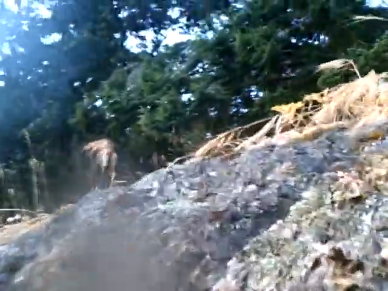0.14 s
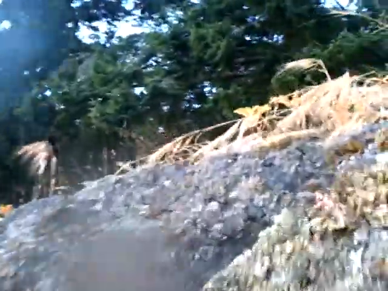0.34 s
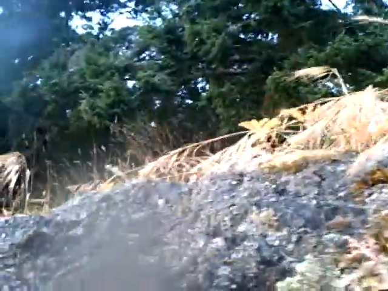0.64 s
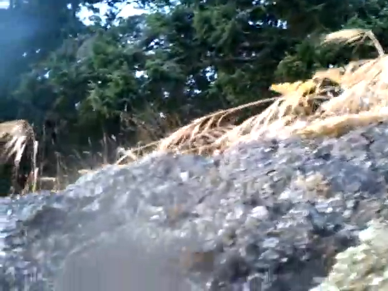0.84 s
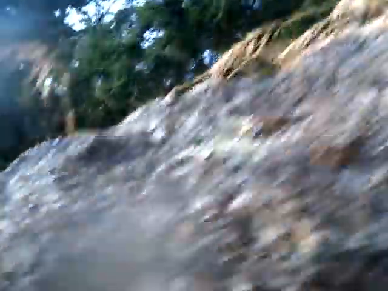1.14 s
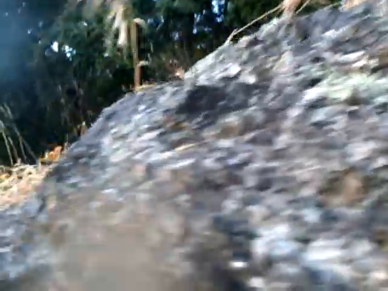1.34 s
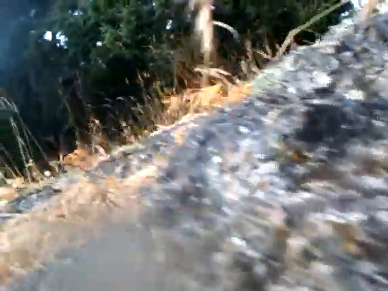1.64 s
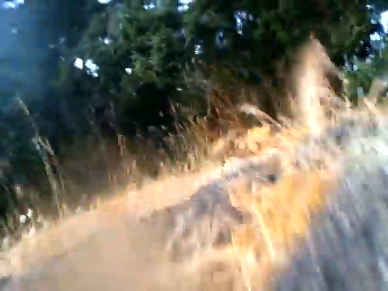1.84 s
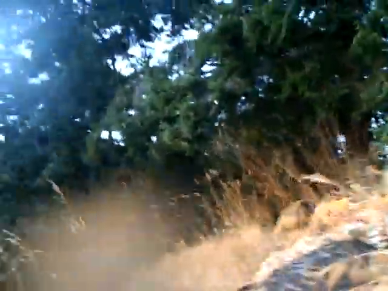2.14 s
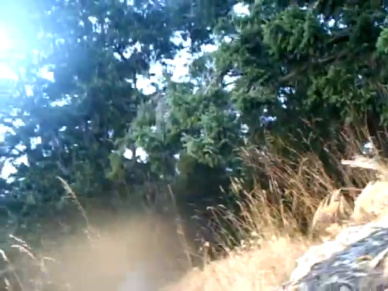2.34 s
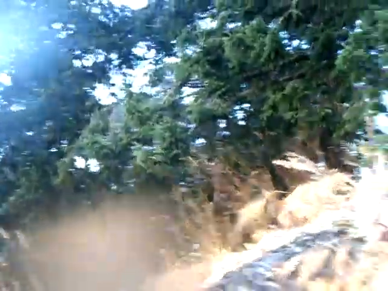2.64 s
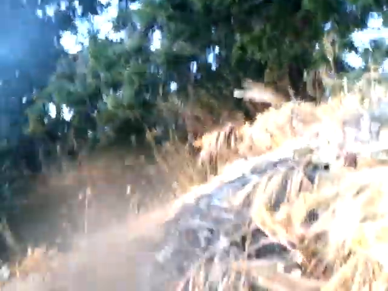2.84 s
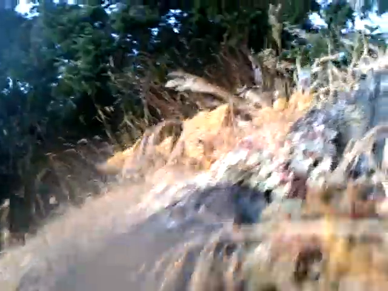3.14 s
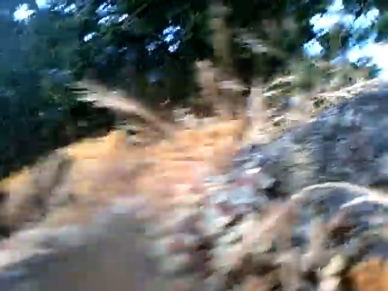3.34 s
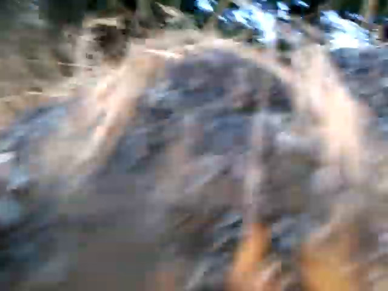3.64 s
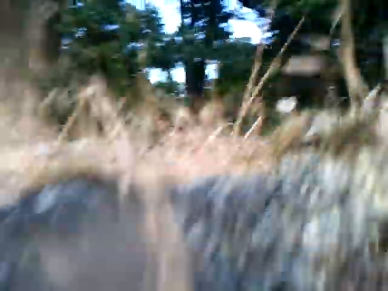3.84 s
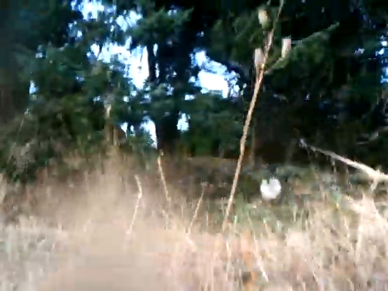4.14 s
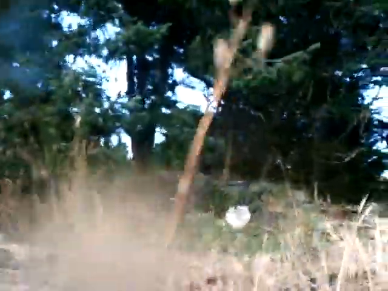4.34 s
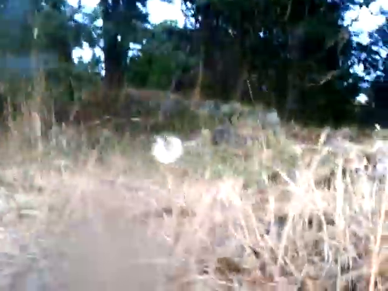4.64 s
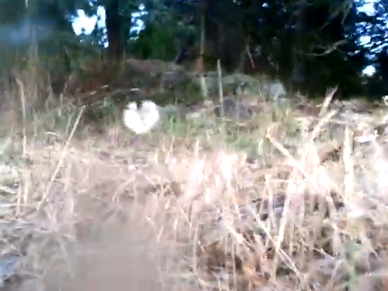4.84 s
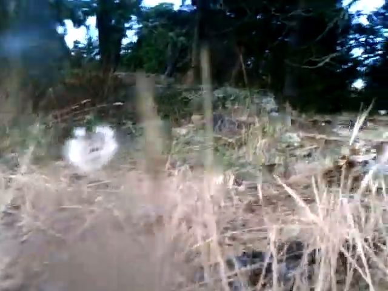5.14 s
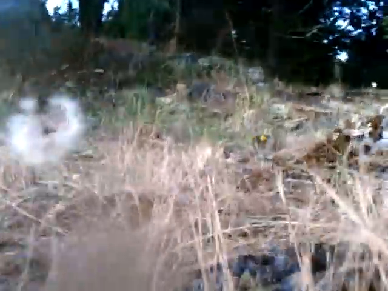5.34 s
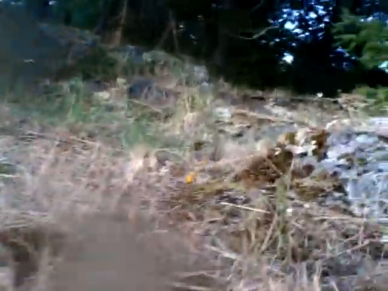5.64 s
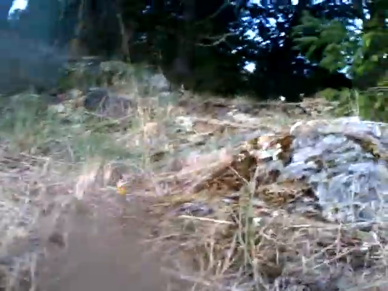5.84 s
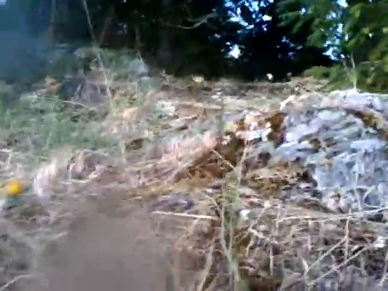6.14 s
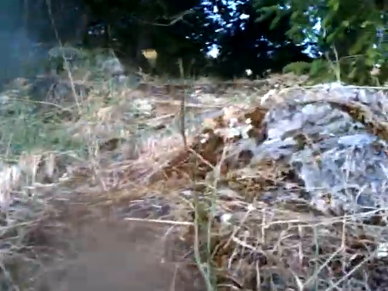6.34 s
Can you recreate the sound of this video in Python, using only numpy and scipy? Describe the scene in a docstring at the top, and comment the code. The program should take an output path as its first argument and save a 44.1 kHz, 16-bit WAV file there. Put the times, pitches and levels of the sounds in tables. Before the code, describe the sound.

A small camera is dragged over rock and through dry grass, heard right at its microphone. For the first 2.7 seconds there are light, stuttering rubs and gritty ticks on the plastic shell, with dull hollow bumps, a brief creak near 1 second and a soft swish of stalks around 1.5. From 2.8 seconds the scraping grows louder. Between 3.2 and 4.7 it is harsh and ringing, and the hardest scrapes distort; sharp stalk snaps come near 3, 3.9 and 4.1. A lull with a few knocks follows, then dry grass crackles, hisses and snaps from about 5.2 seconds. Scrapes build again from 5.5, loudest and distorted around 6.1 and from 6.4 to the end at 6.5. Throughout, a low wind rumble rocks the microphone, with faint electronic hiss and a thin, high, slightly wavering whistle.

```python
"""Gritty rubbing over a low wind rumble: a small camera is dragged through dry grass and over rock.
Grit rubs and strikes its plastic shell, which rings right at the microphone; dull bumps swing the
hollow body, and stalks swish, crackle and snap in the air. From about halfway the hardest scrapes
overdrive the input. Wind rocks the microphone port; the electronics add hiss and two thin whistles."""
import sys
import numpy as np
from scipy.fft import rfft, irfft, next_fast_len
from scipy.io import wavfile
from scipy.ndimage import map_coordinates

SR = 44100
rng = np.random.default_rng(int(sys.argv[2]) if len(sys.argv) > 2 else 0)


def master_out(mix):
    """Clip the mix to full scale and print it as 16-bit PCM to the path in sys.argv[1]."""
    frames = np.transpose(np.atleast_2d(mix))
    ceiling = np.clip(frames, -1, 1)
    pcm = np.round(ceiling * 32767).astype(np.int16)
    wavfile.write(sys.argv[1], SR, pcm)


N = 286650

# The drag, one list a pass: time_s, shell_rub_db, grass_db
DRAG_PASSES = [
    [(0, -33.5, -56), (.07, -59, -59), (.15, -42, -54), (.18, -35, -45.5), (.23, -38, -55), (.35, -44, -52),
     (.44, -64, -62), (.51, -41, -69), (.55, -67, -74), (.62, -60, -64)],
    [(.65, -60, -66), (.69, -50, -60), (.88, -67, -70), (.98, -38.5, -58), (1.01, -44, -67),
     (1.1, -35, -63), (1.15, -33, -62), (1.18, -41.5, -60), (1.21, -28, -60), (1.24, -46.5, -60),
     (1.29, -48, -60), (1.34, -63, -70)],
    [(1.41, -53, -60.5), (1.47, -60, -58.5), (1.51, -34.5, -63.5), (1.62, -47, -54), (1.77, -42.5, -58),
     (2.05, -66, -65), (2.15, -57, -69), (2.23, -38, -70), (2.31, -79, -71), (2.35, -40, -62),
     (2.41, -72, -80), (2.51, -52, -71), (2.59, -74, -76), (2.7, -55, -60.5)],
    [(2.73, -61, -58), (2.76, -36, -68), (2.84, -28.5, -62), (2.9, -17.5, -44), (2.94, -27, -54),
     (3.09, -25.5, -47), (3.13, -35.5, -53.5), (3.19, -68, -68)],
    [(3.22, -38.5, -70), (3.25, -6.5, -66), (3.3, -4, -36), (3.52, -1, -22.5), (3.57, 0.5, -24),
     (3.6, -12.5, -43), (3.65, -10.5, -42), (3.69, -9, -45), (3.73, -3.5, -35), (3.77, -15, -48),
     (3.89, -18.5, -33.5), (3.94, -17.5, -37), (3.96, -27.5, -65), (4.02, -29, -49.5), (4.09, -38, -53),
     (4.13, -53, -71)],
    [(4.15, -53, -56), (4.18, -45, -47), (4.3, -23.5, -42.5), (4.36, -16.5, -46), (4.38, -9.5, -43),
     (4.51, -13.5, -37), (4.57, -33, -55), (4.62, -37, -50), (4.67, -13.5, -54), (4.7, -55, -47)],
    [(4.75, -52.5, -74), (4.96, -40, -59.5), (5.17, -40.5, -51), (5.21, -21, -29), (5.24, -44, -61),
     (5.28, -29.5, -39), (5.37, -37, -45.5), (5.4, -32, -51)],
    [(5.46, -29, -42), (5.5, -32, -46), (5.59, -24.5, -37.5), (5.63, -20, -41.5), (5.68, -24.5, -46),
     (5.76, -24.5, -47), (5.82, -16.5, -39), (5.85, -32, -35), (5.89, -14.5, -31.5), (5.93, -24, -55),
     (5.97, -13.5, -40), (5.99, -5, -38), (6.02, -7.5, -37), (6.07, -3, -51), (6.11, -11.5, -48),
     (6.125, -21, -49), (6.145, -27, -67.5)],
    [(6.17, -27, -48), (6.27, -21, -43), (6.32, -18, -50), (6.35, -35, -70), (6.395, -5.5, -40),
     (6.45, 2.5, -27), (6.5, -2.5, -31)],
]
# The shell's main ring: pitch_hz, width_hz, level_db
SHELL_MODES = [(1346.7, 264, 0), (1479, 354, -17.5), (1045, 540, -22.5), (580, 260, -28),
               (3350, 1040, -28.5)]
# The shell's bright upper ring: pitch_hz, width_hz, level_db
BRIGHT_MODES = [(2038, 315, 15.5), (2540, 580, -46), (3900, 160, -16.5), (4554, 1070, -7.5),
                (7060, 4700, -22.5)]
# Colour of airborne sound at the microphone port: pitch_hz, width_hz, level_db
PORT_MODES = [(4880, 370, -3.5), (6850, 1140, -2.5), (9460, 1200, -5), (11740, 1500, -13.5),
              (15550, 18000, -8.5)]
BITE_S = 0.00099  # attack of a crack, a snap or the panel's hum


def amp(db):
    return 10 ** (np.asarray(db) / 20)


def unit_rms(x):
    return x / np.sqrt(np.mean(x ** 2) + 1e-20)


def curves(rows):
    """One smooth lane of automation for each column after the time."""
    times, *columns = np.vstack(rows).T
    return [np.interp(np.arange(N) / SR, times, column) for column in columns]


def wobble(rate_hz):
    """A smooth random drift, rate_hz turning points a second."""
    points = rng.standard_normal(int(N * rate_hz / SR) + 4)
    return map_coordinates(points, [np.arange(N) * rate_hz / SR])


def swell(start_s, hold_s, level_db, rise_db_per_s, fall_db_per_s):
    """Gain that rises until start_s, holds and falls away."""
    t = np.arange(N) / SR - start_s
    return amp(level_db + rise_db_per_s * np.minimum(t, 0) - fall_db_per_s * np.maximum(t - hold_s, 0))


def filtered(x, response):
    """x through a complex frequency response."""
    size = next_fast_len(x.shape[-1] + SR // 10)
    return irfft(rfft(x, size) * response(np.fft.rfftfreq(size, 1 / SR)), size)[..., :x.shape[-1]]


def coloured_noise(spectrum):
    """Noise of rms 1, shaped by (pitch_hz, level_db) points."""
    pitch_hz, level_db = np.transpose(spectrum)
    tilt = lambda hz: amp(np.interp(np.log(hz + 1), np.log(pitch_hz + 1), level_db))
    return unit_rms(filtered(rng.standard_normal(N), tilt))


def ringing(x, modes):
    """x through steep resonances (each passed twice); white noise keeps its rms."""
    def response(f):
        bands = sum(amp(db) * (1j * f * width / (hz * hz - f * f + 1j * f * width)) ** 2
                    for hz, width, db in modes)
        return bands / np.sqrt(np.mean(np.abs(bands) ** 2))
    return filtered(x, response)


def grit(per_s, spread_db, smooth):
    """Tiny impacts of uneven size over a share of smooth noise, rms 1."""
    size = amp(spread_db * np.minimum(rng.exponential(size=N), 4)) * rng.standard_normal(N)
    grains = unit_rms(size * (rng.random(N) < per_s / SR))
    return unit_rms(grains + smooth * rng.standard_normal(N))


def burst(envelope, modes):
    """One puff of noise rung through resonances, peak 1."""
    sound = ringing(envelope * rng.standard_normal(len(envelope)), modes)
    return sound / np.abs(sound).max()


def add(track, start_s, sound):
    part = track[round(start_s * SR):][:len(sound)]
    part += sound[:len(part)]


def ground_tone():
    """The tone of the ground under the shell, stepping from patch to patch."""
    # start_s, bright_db and body_db (over the rub), swish_db (over the grass)
    patches = [(0, -30, -11, 9), (.62, -25, -40, 8.5), (1.01, -19, -3, 3), (1.13, -22, -23, 7),
               (1.4, -33, -45, 12), (2.72, -12, -13, 3), (2.93, -17, -3, 2), (3.19, -8.5, -18, 13),
               (3.6, -9.5, -16, 6), (3.878, -11, -28, 6.5), (3.96, -3, -11.5, 17.5), (4.14, -9, -16, 9.5),
               (4.57, -23, -16, 5), (4.73, -17, -7.5, 12), (5.16, -13, -13, 7), (5.44, -6.5, -20, 5.5),
               (5.86, -6, -16.5, 5), (6.14, -5.5, -18.5, 11.5), (6.35, -7.5, -19.5, 7)]
    starts, *columns = np.transpose(patches)
    current = np.searchsorted(starts, np.arange(N) / SR, "right") - 1
    return [column[current] for column in columns]


def shell_rub():
    """Rubbing stutters as the shell catches and slips on grit, ringing its walls and hollow body."""
    # The hollow body: pitch_hz, width_hz, level_db
    body_modes = [(409, 97, 4), (336, 147, 2), (173, 29.6, -1), (107, 37, -8)]
    rub_db, _ = curves(DRAG_PASSES)
    bright_db, body_db, _ = ground_tone()
    stutter = amp(rub_db + 2.5 * wobble(25) + 2.5 * wobble(70))
    rattle = amp(body_db + 1.5 * wobble(15))
    ring = ringing(stutter * grit(1500, spread_db=4, smooth=1), SHELL_MODES)
    bright = ringing(stutter * amp(bright_db) * grit(1500, spread_db=4, smooth=1), BRIGHT_MODES)
    body = ringing(stutter * rattle * grit(800, spread_db=3, smooth=1), body_modes)
    return ring + bright + body


def wind():
    """Slow buffeting of the microphone port."""
    # Wind strength: time_s, level_db
    gusts = [(0.0, -32.5), (0.98, -49.5), (1.18, -28), (1.86, -37), (1.92, -38), (2.19, -36.5), (2.23, -39),
             (3.08, -34.5), (3.11, -42.5), (3.55, -25), (4.27, -44), (4.4, -33), (4.54, -39.5),
             (5.77, -42.5), (5.83, -32.5), (6.19, -42.5), (6.43, -31), (6.5, -34)]
    # Rumble spectrum: pitch_hz, level_db
    rumble = [(12, -8.5), (27, -14.5), (46, -3), (58, -9.5), (70, -47), (100, -34), (200, -52), (400, -92)]
    level_db, = curves(gusts)
    return amp(level_db + 2 * wobble(7.3)) * coloured_noise(rumble)


def electronics():
    """A noise floor and two whistles whose pitch wavers."""
    # Whistles: pitch_hz, level_db, waver_hz
    tones = [(7736, -70, 25), (15470, -64, 5)]
    # Hiss spectrum: pitch_hz, level_db
    hiss = [(80, 7), (250, -3), (1100, -15), (1400, 9.5), (1800, -41), (3000, -6.5), (5000, -21),
            (16500, -20)]
    whistles = sum(amp(db + 5) * np.sin(2 * np.pi * np.cumsum(hz + waver_hz * wobble(60)) / SR)
                   for hz, db, waver_hz in tones)
    return amp(-51.5) * coloured_noise(hiss) + whistles


def grass():
    """Stalks swish and crackle densely; the larger ones snap singly."""
    # Soft tufts swiping the shell: start_s, hold_s, level_db
    swipes = [(0.157, 0.016, -46), (0.7, .005, -56), (0.95, 0.036, -42), (1.26, 0.016, -43),
              (1.496, 0.047, -36), (1.57, 0.026, -40), (2.173, .01, -62), (2.345, .02, -60),
              (2.959, 0.0044, -21), (3.992, 0.044, -30.5), (5.484, .006, -40), (5.607, .01, -29),
              (5.88, 0.014, -21)]
    # Colour of soft stalks: pitch_hz, width_hz, level_db
    swish_modes = [(1520, 384, 13), (2190, 370, 4.5), (2830, 410, 2.5), (3827, 280, 0.5)]
    # Stalks breaking: start_s, level_db, pitch_hz
    snaps = [(0.1994, -28, 9100), (0.2294, -32, 9070), (0.2694, -32, 9900), (0.2962, -34, 9300),
             (0.463, -35, 8100), (0.693, -37, 7740), (1.567, -22, 7200), (1.607, -23.5, 8750),
             (1.6168, -23.5, 7040), (1.6464, -26, 8570), (2.2655, -31.5, 6860), (2.326, -36, 9170),
             (2.961, -11, 4970), (3.8503, -3, 5460), (4.108, -8.5, 6800), (5.018, -24.5, 7140),
             (5.1724, -25, 6830), (5.199, -18, 9400), (5.2089, -8.5, 9400), (5.217, -9.5, 11400),
             (5.274, -17, 7540), (5.3073, -11.5, 6230), (5.3374, -15.5, 6280), (5.3504, -21, 6280),
             (5.3717, -18.5, 6200), (5.4197, -16, 8000), (5.4518, -19, 6740), (5.5068, -15, 6840),
             (5.536, -14, 7010), (5.7327, -19, 5900), (5.786, -14, 9000), (5.903, -17, 5900),
             (6.058, -8, 5330), (6.1, 1, 7260)]
    _, grass_db = curves(DRAG_PASSES)
    *_, swish_db = ground_tone()
    tufts = sum(swell(*swipe, rise_db_per_s=1500, fall_db_per_s=1000) for swipe in swipes)
    flutter = amp(3 * wobble(30))
    crackle = ringing(flutter * amp(grass_db) * grit(1500, spread_db=5, smooth=0.89), PORT_MODES)
    swish_gain = flutter * (amp(grass_db + swish_db) + tufts)
    swish = ringing(swish_gain * grit(1200, spread_db=1, smooth=0.8), swish_modes)
    out = crackle + swish
    t = np.arange(SR // 40) / SR
    snap_envelope = amp(-60 * t / 0.011) * (1 - np.exp(-t / BITE_S))
    for start_s, level_db, pitch_hz in snaps:
        stalk_modes = [(pitch_hz, 1200, 4), (3200, 2500, -1)]
        add(out, start_s, amp(level_db - 2.5) * burst(snap_envelope, stalk_modes + PORT_MODES))
    return out


def fine_blades():
    """Fine blades slide past the port with a soft, airy hiss."""
    # Each slide: start_s, hold_s, level_db
    slides = [(0.0, 0.39, -57.5), (4.955, 0.13, -50.5), (5.17, 0.047, -42.5), (5.267, 0.054, -41)]
    # Three high bands of hiss: pitch_hz, width_hz, level_db
    air_bands = [(7600, 940, 5.5), (8800, 1600, 5.5), (10900, 920, 2)]
    gain = sum(swell(*slide, rise_db_per_s=600, fall_db_per_s=600) for slide in slides)
    return ringing(gain * amp(1.2 * wobble(17)) * rng.standard_normal(N), air_bands)


def stone_scuffs():
    """A stone bites the shell at once, drags for some milliseconds and lets go abruptly."""
    # Hard scuffs: start_s, level_db, bright_db (over the main ring), length_s
    scuffs = [(0.124, -16.5, -32, 0.01), (0.165, -17.5, -29, 0.015), (0.177, -9, -30, 0.0061),
              (0.214, -12.5, -33, 0.0051), (0.229, -13.5, -29, 0.0099), (0.242, -15, -25, 0.0044),
              (0.317, -23, -14, 0.0053), (0.346, -21, -24, 0.0092), (0.461, -27, -15, 0.0032),
              (0.493, -15.5, -31, 0.0066), (0.518, -17, -29, 0.0031), (0.5636, -23.5, -9, 0.0031),
              (0.696, -24.5, -16, 0.001), (1.026, -22.5, -28, 0.0051), (1.131, -13, -23, 0.0032),
              (1.207, -30, -28, 0.0058), (1.435, -23.5, -33, 0.01), (1.8133, -20.5, -30, 0.0049),
              (2.169, -25, -9, 0.012), (2.758, -22.5, 1, 0.0048), (2.785, -11.5, -8.5, 0.013),
              (2.823, -7.5, -30, 0.01), (2.8477, -4.5, -9, 0.011), (2.8627, 4.5, -4.5, 0.022),
              (2.892, 4.5, -16, 0.0069), (2.904, 2, -7.5, 0.009), (2.962, -12.5, -17, 0.02),
              (3.008, -20.5, 10.5, 0.0075), (3.095, -8, -23, 0.015), (3.2443, 6.5, -6.5, 0.011),
              (3.621, 1, -22, 0.0023), (3.707, 12.5, -14, 0.0067), (3.786, 12.5, -10, 0.0023),
              (3.812, 13.5, -14.5, 0.016), (3.85, 5, -5.5, 0.0061), (3.913, -8.5, 1, 0.015),
              (3.9864, -7.5, -6, 0.0078), (4.1018, 1, -14, 0.0064), (4.217, -9.5, -8, 0.006),
              (4.2584, -11, -23, 0.012), (4.2872, -4, -2.5, 0.0067), (4.34, -25, -6, 0.0034),
              (4.373, 10.5, -1.5, 0.0027), (4.4016, 10, -7.5, 0.0018), (4.443, 6, -3.5, 0.025),
              (4.515, 9, -29, 0.0045), (4.6, -12, -27, 0.012), (4.665, -6, -21, 0.0028),
              (4.773, -22.5, -21, 0.0067), (5.017, -18.5, -11, 0.007), (5.048, -22, -22, 0.0061),
              (5.272, -15, -27, 0.016), (5.335, -13, 1, 0.0063), (5.3566, -11.5, -13, 0.034),
              (5.443, -7, -24, 0.0044), (5.4768, 3, -2, 0.0086), (5.527, -12, -25, 0.008),
              (5.597, -12, 1, 0.014), (5.6199, 6.5, -9.5, 0.0031), (5.6445, -9, 1, 0.0092),
              (5.695, -4.5, -24, 0.012), (5.7327, 10.5, -10.5, 0.0019), (5.7505, 10, -10.5, 0.017),
              (5.791, 0, -5.5, 0.014), (5.8147, 12, -6, 0.0063), (5.876, -17, -12, 0.0053),
              (5.884, 6, -20, 0.0048), (5.9, 4, -14, 0.013), (5.927, -5.5, -6, 0.0097),
              (5.945, -4, -0.5, 0.009), (5.98, 1, 0, 0.0047), (6.097, 16.5, -27, 0.0089),
              (6.163, -21, -21, 0.0084), (6.21, -16, -35, 0.0082), (6.2662, -0.5, 0.5, 0.0024),
              (6.351, -5, -11, 0.002), (6.369, 4, -12, 0.0027), (6.384, 1, -10, 0.0089)]
    out, t = np.zeros(N), np.arange(SR // 15) / SR
    for start_s, level_db, bright_db, length_s in scuffs:
        envelope = np.exp(-(t / max(length_s, 0.001)) ** 4) + 0.69 * np.exp(-t / 0.0033)
        ring = burst(envelope, SHELL_MODES)
        bright = amp(bright_db) * burst(envelope, BRIGHT_MODES)
        air_crack = amp(bright_db - 20.5) * burst(envelope * (1 - np.exp(-t / BITE_S)), PORT_MODES)
        add(out, start_s, amp(level_db - 5.5) * (ring + bright + air_crack))
    return out


def knocks():
    """A bump swings the hollow body, shoves the capsule, sets a flat panel humming and taps the shell."""
    # Dull bumps: start_s, level_db, pitch_hz, tap_db (relative to level_db)
    bumps = [(0.128, -27, 394, -26), (0.182, -28, 407, -33), (0.212, -25, 393, -15), (0.228, -28, 376, -36),
             (0.263, -28.5, 396, -29), (0.367, -35, 390, -35), (0.495, -26.5, 386, -35),
             (0.515, -26, 380, -31), (1.112, -19, 400, -26), (1.17, -14, 294, -22), (1.191, -22, 158, -20),
             (1.205, -17, 168, -10), (1.443, -12.5, 292, -25), (2.783, -26, 396, -13),
             (2.909, -19, 376, -13), (3.007, -19, 513, -5.5), (3.07, -18, 404, -11.5), (3.915, -35, 396, 3),
             (4.314, -21.5, 400, -4.5), (4.648, -27.5, 410, -15), (4.846, -34.5, 400, -7),
             (4.953, -23, 395, -12.5), (5.017, -23, 400, -11.5), (5.222, -31, 396, -23),
             (5.335, -23, 415, -21), (5.729, -23, 571, 1), (5.813, -12.5, 440, -6), (6.264, -26, 417, -13)]
    # Colour of the tap: pitch_hz, width_hz, level_db
    tap_modes = [(525, 350, 1), (902, 740, 3), (1290, 203, 5.5), (2140, 690, -17.5), (2980, 340, -9.5)]
    # One creak: seven quick slips, each a little harder, in the same columns as the bumps
    creak = [(1.0225 + slip * 0.015 + 0.0008 * rng.normal(), -28 + slip * 1.46,
              386 + 60 * rng.normal(), -14) for slip in range(7)]
    out, t = np.zeros(N), np.arange(SR // 15) / SR
    panel_hz, panel_t60_s, swing_cycles = 512, 0.038, 9
    panel = amp(-15 - 60 * t / panel_t60_s) * (1 - np.exp(-t / BITE_S)) * np.sin(2 * np.pi * panel_hz * t)
    shove = amp(-5 - 60 * t / 0.013) * np.sin(2 * np.pi * 105 * t)
    for start_s, level_db, pitch_hz, tap_db in bumps + creak:
        envelope = amp(-60 * t * pitch_hz / swing_cycles) * (1 - np.exp(-t / 0.001))
        swing = envelope * np.sin(2 * np.pi * pitch_hz * t)
        thud = amp(level_db + 7) * (swing + shove + panel)
        tap = amp(level_db + tap_db + 13) * burst(t * np.exp(-t / 0.0004), tap_modes)
        add(out, start_s + 0.001496, thud + np.roll(tap, SR // 700))  # the tap lands 1.4 ms later
    return out


def scene():
    camera = shell_rub() + stone_scuffs() + knocks()
    return (camera + grass() + fine_blades() + wind() + electronics())[None]


def record(dry):
    """The input stage clips flat; the very top rolls off and ends at a hard limit."""
    ceiling, rolloff_hz, limit_hz = 0.68, 15750, 16350
    clipped = dry[0] / (1 + np.abs(dry[0] / ceiling) ** 8) ** (1 / 8)
    high_cut = lambda hz: (hz < limit_hz) * amp(-25 * np.clip((hz - rolloff_hz) / 300, 0, 1))
    return filtered(clipped, high_cut)[None]


dry = scene()
out = record(dry)
master_out(out)
```